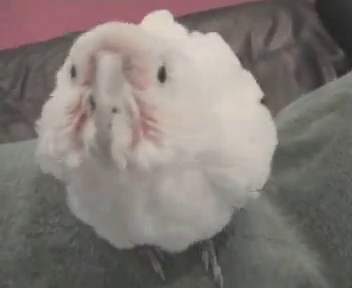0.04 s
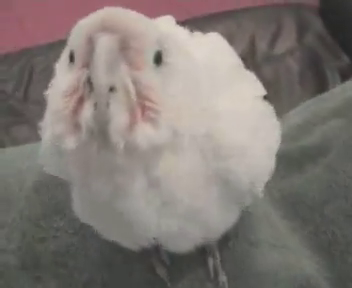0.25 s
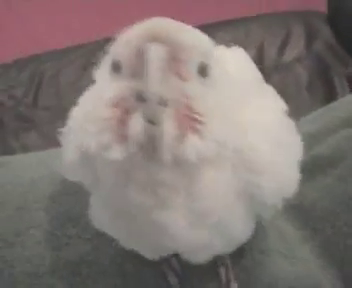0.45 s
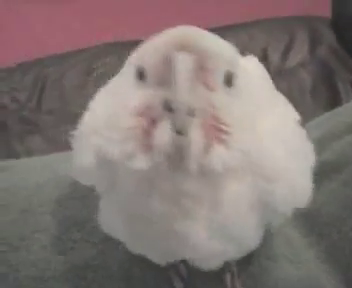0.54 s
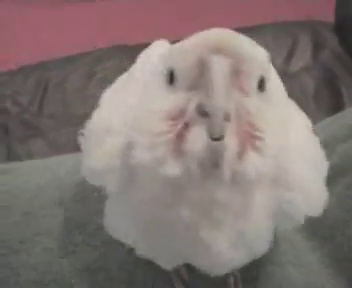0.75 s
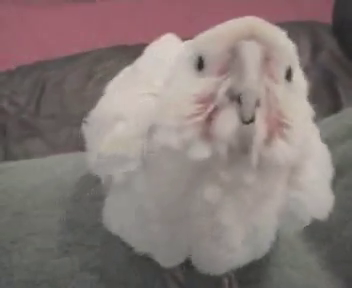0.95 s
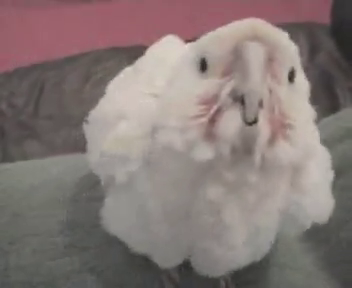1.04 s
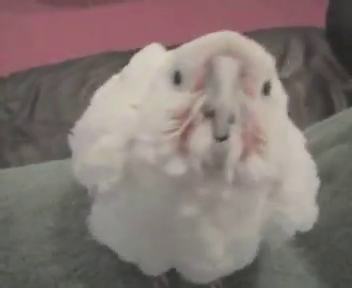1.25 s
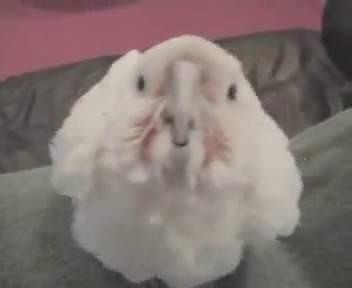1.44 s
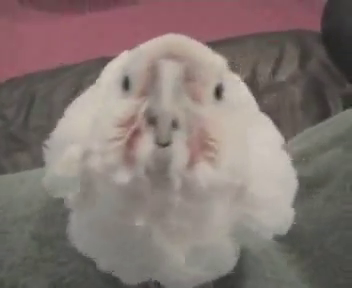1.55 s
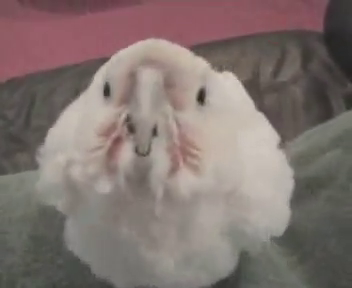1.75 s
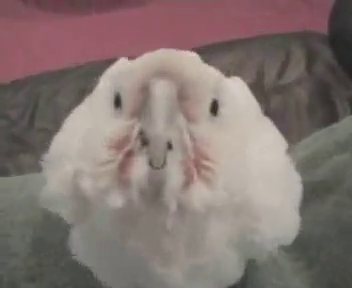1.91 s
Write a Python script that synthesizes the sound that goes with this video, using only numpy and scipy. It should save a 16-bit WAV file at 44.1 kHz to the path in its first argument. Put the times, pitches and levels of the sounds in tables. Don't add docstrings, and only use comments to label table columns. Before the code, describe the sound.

A young cockatoo gives one close raspy call. A faint peep rises at 0.05-0.14 s, breaking into soft, uneven creaky clicks that strengthen and brighten until about 0.5 s. From about 0.55 s they quicken into a loud, rough buzz, stuttering from 1.3 s and ending in a short falling peep at 1.55-1.62 s. Faint tape whine, rapid ticking, a thin high tone and hiss run throughout the dry, quiet room.

```python
import sys
import numpy as np
from scipy import signal
from scipy.fft import rfft, irfft, next_fast_len
from scipy.io import wavfile

SR = 44100
rng = np.random.default_rng(int(sys.argv[2]) if len(sys.argv) > 2 else 0)


def pcm_store(signal):
    levels = np.round(np.clip(np.atleast_2d(signal), -1, 1) * 32767)
    wavfile.write(sys.argv[1], SR, levels.astype(np.int16).T)


def volts_from_decibels(level):
    exponent = np.asarray(level, float) / 20
    return 10 ** exponent


N = 88200


def unit(x):
    return x / np.sqrt(np.mean(x ** 2) + 1e-20)


def along(points, hz):
    f, v = np.transpose(points)
    return np.interp(np.log(hz + 1), np.log(f + 1), v)


def curves(rows):
    s, *columns = np.transpose(rows)
    return [np.interp(np.arange(N) / SR, s, column) for column in columns]


def filtered(x, response):
    m = 2 * next_fast_len(N // 2 + SR // 8)
    return irfft(rfft(x, m) * response(np.fft.rfftfreq(m, 1 / SR)), m)[..., :N]


def causal(gain):
    c = irfft(np.log(gain + 1e-6))
    c = c * np.r_[1, 2 * np.ones(len(gain) - 2), 1, np.zeros(len(gain) - 2)]
    return irfft(np.exp(rfft(c)))[:len(gain)]


def click_times():
    # (start [s], rate [clicks/s], timing scatter [log], stall chance [0-1],
    # weakness of every second click [dB])
    stretches = [(.143, 800, .05, 0, 2), (.226, 600, .15, .35, 2), (.28, 290, .15, 0, 1),
                 (.32, 500, .2, .4, 2), (.345, 200, .1, 0, 1), (.41, 205, .1, 0, 1), (.47, 265, .1, 0, 1),
                 (.548, 600, .15, .1, 3), (.567, 600, .15, .1, 2), (.58, 280, .1, 0, 1),
                 (.69, 690, .2, .02, 3), (.78, 705, .14, 0, 4), (.845, 690, .18, .05, 2.5),
                 (.935, 701, .028, 0, 7), (1.038, 690, .21, .02, 2.5), (1.275, 700, .04, 0, 4),
                 (1.306, 660, .17, .1, 3), (1.36, 640, .15, 0, 3), (1.413, 640, .12, 0, 1)]
    # (last click [s], next
    # click [s])
    pauses = [(.1542, .1656), (.1657, .2034), (.2035, .2184), (.2185, .2258), (.249, .254), (.254, .2633),
              (.2633, .269), (.276, .2819), (.3089, .3157), (.3157, .321), (.3312, .3462), (.3462, .3556),
              (.3629, .3698), (.3751, .3821), (.3821, .389), (.3994, .4069), (.421, .4278), (.4469, .4529),
              (.5418, .5484), (.5604, .5673), (.7227, .7263), (.7362, .7396), (.7628, .7668),
              (.8478, .8509), (.8543, .8573), (.8613, .864), (.8773, .8883), (.9022, .9051), (.9212, .9247),
              (.9283, .9343), (1.0432, 1.0461), (1.0724, 1.0777), (1.1008, 1.1046), (1.1212, 1.125),
              (1.1446, 1.1476), (1.1695, 1.1765), (1.1835, 1.1874), (1.193, 1.1973), (1.2312, 1.2357),
              (1.2412, 1.2498), (1.2648, 1.2679), (1.2717, 1.2757),
              (1.3085, 1.3117), (1.3233, 1.3273), (1.3273, 1.3303), (1.3303, 1.3334), (1.3405, 1.3437),
               (1.3473, 1.3575), (1.3642, 1.3685), (1.3759, 1.3793), (1.3809, 1.3851), (1.3893, 1.3944),
               (1.3944, 1.3988), (1.4027, 1.4131), (1.4131, 1.4165), (1.4191, 1.4224), (1.4255, 1.4311),
               (1.4311, 1.4344), (1.4356, 1.4409), (1.4409, 1.4452), (1.4452, 1.4485), (1.4485, 1.4523),
               (1.4547, 1.4603), (1.4631, 1.4703), (1.4716, 1.4794), (1.4794, 1.4829), (1.4846, 1.4906),
               (1.4906, 1.4964), (1.4975, 1.5031), (1.504, 1.5095), (1.5109, 1.5187), (1.5187, 1.5224),
               (1.5236, 1.5305), (1.5305, 1.5355), (1.5395, 1.5434), (1.5448, 3)]
    stall_s, limp = .0012, .07
    chance, luck = rng.standard_normal(1500), rng.random((1500, 2))
    t, k, rows = stretches[0][0], 0, []
    while t < N / SR:
        _, rate, scatter, stall, alternate_db = [row for row in stretches if row[0] <= t][-1]
        rows.append((t, alternate_db * (k % 2)))
        gap = np.exp(scatter * chance[k] + limp * (-1) ** k) / rate
        if luck[k, 0] < stall:
            gap += stall_s * (.5 + 2 * luck[k, 1] ** 2)
        after = t + gap
        for shut, opens in pauses:
            nearly_shut = shut - 1 / rate / 2
            if t < opens and after > nearly_shut:
                after = shut if t < nearly_shut else opens
                break
        t, k = after, k + 1
    return np.transpose(rows)


def click_strengths(times, weak_db):
    # (time [s], click strength [dB])
    effort = [(.14, -30), (.165, -22.5), (.23, -24), (.33, -22.5), (.45, -15.5), (.6, -12.5), (.68, -11.5),
              (.75, -10), (.88, -10.5), (.95, -6.5), (1.1, -11), (1.25, -10), (1.35, -11), (1.45, -12.5),
              (1.55, -15)]
    # (time [s], share of dull clicks [0-1], weakness of a burst's first click [dB])
    tiring = [
        (.14, 0.3, -1),
        (.5, 0.31, -4.5),
        (1.25, 0.33, 0.5),
        (1.36, 0.61, -1.5),
        (1.42, 0.78, -2.5),
        (1.55, 1, -3),
    ]
    last_db, size_db = .5, .7
    lone_db, lone_s = 4, .0125
    pressure_grows, longest_s = .22, .004
    before = np.minimum(np.diff(times, prepend=0), longest_s)
    ahead = np.minimum(np.diff(times, append=3), longest_s)
    s, *tired = np.transpose(tiring)
    dull_share, restart_db = (np.interp(times, s, column) for column in tired)
    weak_db = np.where(before > 2 * ahead, restart_db, weak_db)
    weak_db = np.where(ahead > 2 * before, -last_db, weak_db)
    weak_db = weak_db - size_db * rng.standard_normal(len(times))
    weak_db = weak_db - lone_db * (np.gradient(times) > lone_s / 2)
    strength_db = np.interp(times, *np.transpose(effort)) - weak_db
    size = -volts_from_decibels(strength_db) * (2 * ahead / longest_s) ** pressure_grows
    soft = np.clip(dull_share * (1 + weak_db / 10), 0, 1)
    return size, soft


def clicks():
    soft_hz, ragged, puff_s = 3000, .065, .0006
    times, weak_db = click_times()
    size, soft = click_strengths(times, weak_db)
    at = times[:, None] * SR
    taps = np.floor(at).astype(int) + np.arange(-8, 9)
    pulse = np.sinc(taps - at) * np.cos(np.pi * (taps - at) / 18) ** 2

    def place(share):
        return np.bincount(taps.ravel(), ((size * share)[:, None] * pulse).ravel(), N)

    hard, dull = place(1 - soft), place(soft)
    snaps = hard + filtered(dull, lambda hz: 1 / (1 + 1j * hz / soft_hz) ** 2)
    puff = signal.fftconvolve(hard, np.exp(-np.arange(SR // 100) / SR / puff_s))[:N]
    return snaps + ragged * puff * rng.standard_normal(N)


def tract(opening):
    # (frequency [Hz], width [Hz], level [dB])
    beak_shut = [(770, 720, -10.5), (1810, 780, -7), (2410, 800, -1.5), (3970, 1500, -12.5),
                 (4670, 640, -7), (6300, 1900, -17.5), (7180, 370, -9.5), (9700, 780, -52),
                 (13000, 590, -52)]
    # (frequency [Hz], width [Hz], level [dB])
    beak_open = [(720, 840, -14), (1760, 760, -9.5), (2446, 600, 0), (3790, 710, -6), (4890, 605, -0.5),
                 (5320, 260, -17), (7800, 600, -29.5), (10400, 600, -56), (12800, 260, -41)]
    # (frequency [Hz], width [Hz], level [dB])
    beak_wide = [(800, 980, -8.5), (1630, 200, -11), (2754, 800, 4.5), (3760, 1180, 2.5), (4937, 740, 3),
                 (6740, 1200, -39), (7650, 340, -19.5), (10600, 610, -47.5), (13350, 700, -33.5)]
    skirt, low_hz = 2, 310
    notch_hz, notch_open_hz, notch_wide, notch_deep = 3050, 7000, .16, .1
    hollow_hz, hollow_wide_hz, hollow_deep = 8900, 750, .25
    f = np.fft.rfftfreq(2 ** 11, 1 / SR)
    a, b = np.array([beak_shut, beak_open, beak_wide])[[0, 1] if opening < 1 else [1, 2]]
    resonances = a + (b - a) * (opening - (opening >= 1))
    power = sum(volts_from_decibels(db) ** 2 / (1 + (2 * (f - c) / w) ** 2) ** skirt for c, w, db in resonances)
    centre = notch_hz * (notch_open_hz / notch_hz) ** min(opening, 1)
    deep = notch_deep ** max(1 - (opening / 1.1) ** 5, 0)
    u = (f - centre) / (notch_hz * notch_wide * np.sqrt(centre / notch_hz))
    notch = (u ** 2 + deep ** 2) / (u ** 2 + 1)
    v = (f - hollow_hz) / hollow_wide_hz
    hollow = (v ** 2 + hollow_deep ** 2) / (v ** 2 + 1)
    h = causal(np.sqrt(power * hollow * notch) * f ** 2 / (f ** 2 + low_hz ** 2))
    return h / abs(h).max()


def rasp(count=17):
    # (time [s], beak opening [0-2])
    beak = [
        (.14, .0),
        (.25, .04),
        (.33, .15),
        (.37, .3),
        (.4, .55),
        (.44, .85),
        (.48, 1),
        (.67, 1.1),
        (.72, 1.5),
        (1.5, 1.9),
    ]
    tremble, tremble_s = .2, .003
    source, (opening,) = clicks(), curves(beak)
    knots = np.arange(0, N / SR, tremble_s)
    wobble = np.interp(np.arange(N) / SR, knots, rng.standard_normal(len(knots)))
    opening = np.maximum(opening + tremble * wobble * (opening > 1), np.minimum(opening, 1))
    step = np.clip(opening / 2, 0, 1) * (count - 1)
    call = np.zeros(N)
    for k in range(count):
        share = np.clip(1 - abs(step - k), 0, 1)
        call += signal.fftconvolve(source * share, tract(2 * k / (count - 1)))[:N]
    return call


def peep(rows, orders, edge_s):
    hz, db = curves(rows)
    t = np.arange(N) / SR
    gate = np.clip(np.minimum(t - rows[0][0], rows[-1][0] - t) / edge_s, 0, 1)
    phase = 2 * np.pi * np.cumsum(hz) / SR
    tones = sum(volts_from_decibels(level) * np.sin(k * phase) for k, level in orders)
    return np.sqrt(2) * gate * volts_from_decibels(db) * tones


def opening_peep():
    # (time [s], pitch [Hz], level [dB])
    path = [
        (0.04, 952, -81),
        (0.05, 1000, -42),
        (0.078, 1165, -41),
        (0.114, 1328, -43),
        (0.138, 1328, -38.5),
        (0.145, 1359, -83),
    ]
    # (multiple of the pitch [x], level [dB])
    overtones = [(1, 0.5), (2, -8.5), (3, -15.5), (4, -18.5), (5, -23), (6, -37)]
    return peep(path, overtones, edge_s=0.0042)


def closing_peep():
    # (time [s], pitch [Hz], level [dB])
    path = [
        (1.5525, 1170, -36.5),
        (1.559, 1086, -39),
        (1.58, 1080, -41.5),
        (1.603, 1085, -47.5),
        (1.625, 1040, -70),
    ]
    # (multiple of the pitch [x], level [dB])
    overtones = [(1, 0), (2, -4), (3, -3), (4, -17), (5, -21)]
    return peep(path, overtones, edge_s=0.00035)


def room(bird):
    room_db, t60_s, wide = -17, 0.086, 0.13
    t = np.arange(SR // 5) / SR
    noise = rng.standard_normal(len(t)) + wide * rng.standard_normal((2, len(t)))
    tail = noise * volts_from_decibels(-60 * t / t60_s)
    return volts_from_decibels(room_db) * signal.fftconvolve(bird[None], tail / np.linalg.norm(tail[0]), axes=1)[:, :N]


def drive():
    # (frequency [Hz], width [Hz], level [dB])
    bands = [(1140, 350, -68.5), (1000, 140, -69), (3100, 42, -72.5), (4360, 230, -64.5), (4900, 840, -64),
             (9300, 120, -104.5)]
    # (time [s], whine level [dB])
    swell = [
        (0, -3.5),
        (.3, 2),
        (1.65, 0),
        (1.75, -8),
        (1.85, 0),
        (2, -0.5),
    ]
    tick_s, tick_gap_s = 1.6245, .03337
    tick_hz, tick_t60_s, tick_db = 1920, 0.031, -48.5
    whine = np.zeros(N)
    for c, w, db in bands:
        hum = filtered(rng.standard_normal(N), lambda f: 1 / (1 + (2 * (f - c) / w) ** 2))
        whine += volts_from_decibels(db) * unit(hum)
    at = np.round(np.arange(tick_s % tick_gap_s, N / SR, tick_gap_s) * SR).astype(int)
    t = np.arange(SR // 20) / SR
    ring = volts_from_decibels(-60 * t / tick_t60_s) * (1 - np.exp(-t / 0.0013)) * np.sin(2 * np.pi * tick_hz * t)
    ticks = np.bincount(at, volts_from_decibels(tick_db + 0.52 * rng.standard_normal(len(at))), N + 1)
    return whine * volts_from_decibels(curves(swell)[0]) + signal.fftconvolve(ticks, ring)[:N]


def scan():
    # (time [s], level [dB])
    tone_level = [
        (0, -62),
        (.4, -70),
        (1.55, -78),
        (1.75, -68),
        (2, -63),
    ]
    scan_hz, lead_rad, pan_db = 15673, 1.45, -2
    side = np.array([[.5], [-.5]])
    level = volts_from_decibels(curves(tone_level)[0] + 2 * side * pan_db)
    return np.sqrt(2) * level * np.sin(2 * np.pi * scan_hz * np.arange(N) / SR + side * lead_rad)


def air():
    # (frequency [Hz], level per Hz [dB])
    shared_hiss = [(20, -23), (50, -7.5), (70, -4), (1200, -11.5), (2700, -15), (4900, -11.5), (14000, -33),
                   (15600, -34)]
    # (frequency [Hz], level per Hz [dB])
    side_hiss = [(20, -26), (70, -7.5), (190, -6), (1000, -7.5), (3000, -20), (8900, -13.5), (14000, -30),
                 (15600, -15)]

    def hiss(colour, db):
        return volts_from_decibels(db) * unit(filtered(rng.standard_normal(N), lambda hz: volts_from_decibels(along(colour, hz))))

    mid, side = hiss(shared_hiss, -60), hiss(side_hiss, -61.5)
    return np.array([mid + side, mid - side])


def scene():
    # (frequency [Hz], side level under the bird [dB])
    off_centre = [(250, -26), (700, -22.5), (1500, -41), (2500, -59), (6000, -63), (10000, -22)]
    bird = rasp() + opening_peep() + closing_peep()
    side = filtered(bird, lambda hz: volts_from_decibels(along(off_centre, hz)))
    return bird + np.array([side, -side]) + room(bird) + drive() + scan() + air()


def roll_off(x):
    return signal.sosfilt(signal.butter(12, 15920, fs=SR, output="sos"), x)


def record(dry):
    return roll_off(dry)


dry = scene()
out = record(dry)
pcm_store(out)
```